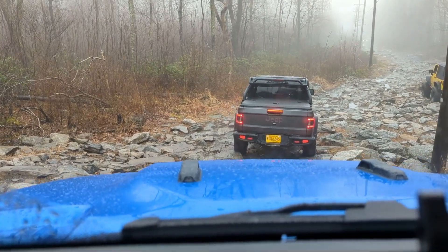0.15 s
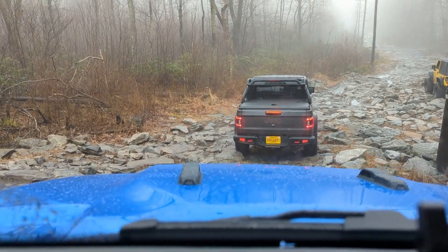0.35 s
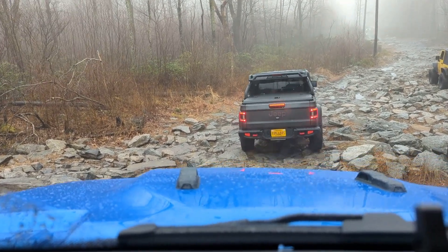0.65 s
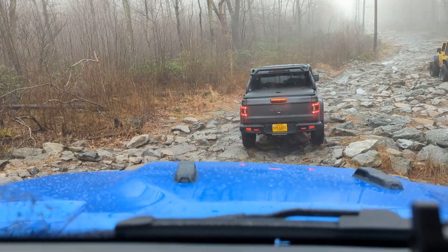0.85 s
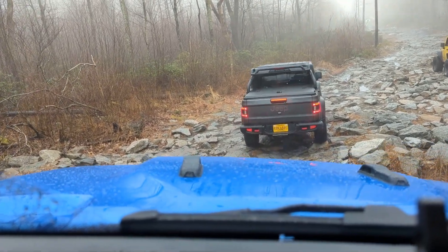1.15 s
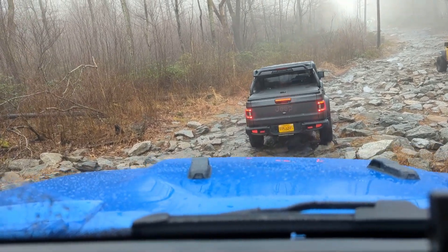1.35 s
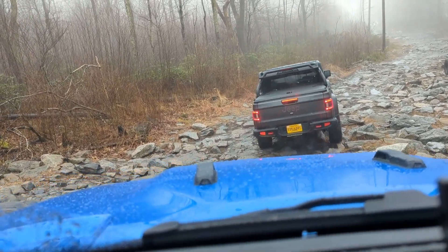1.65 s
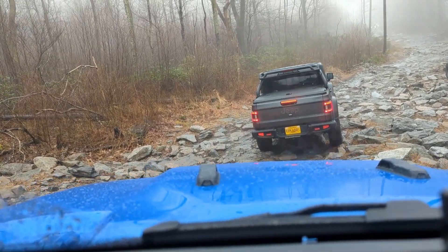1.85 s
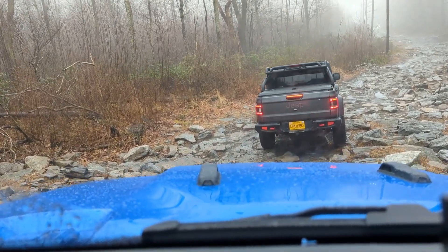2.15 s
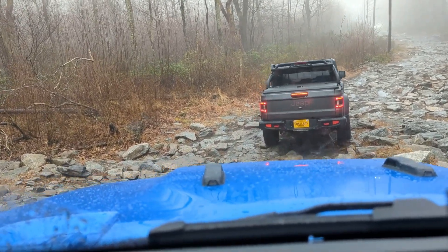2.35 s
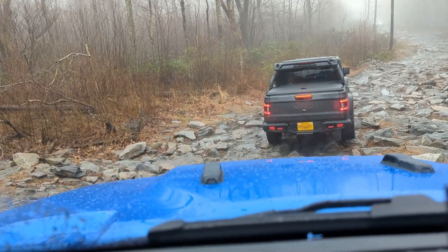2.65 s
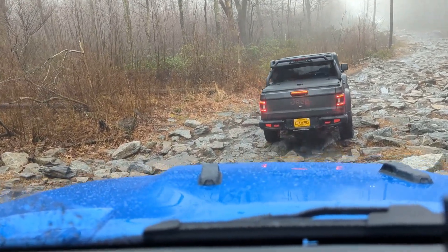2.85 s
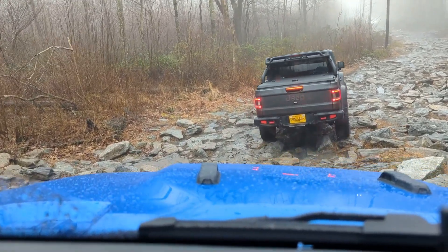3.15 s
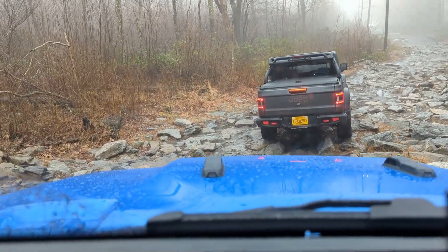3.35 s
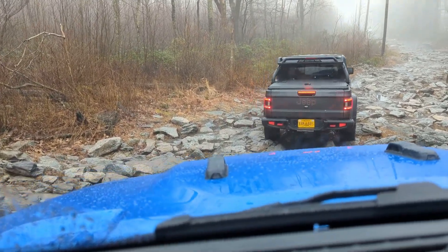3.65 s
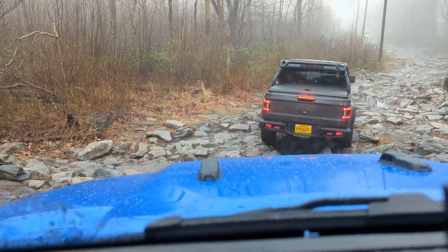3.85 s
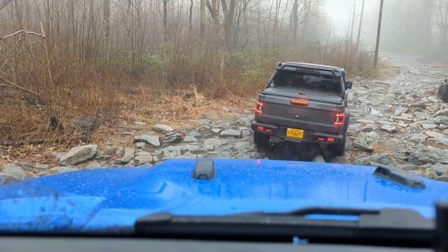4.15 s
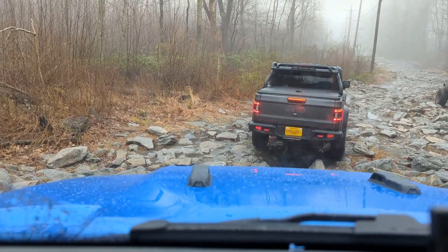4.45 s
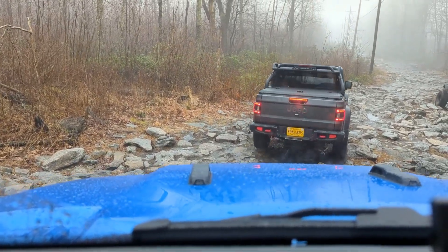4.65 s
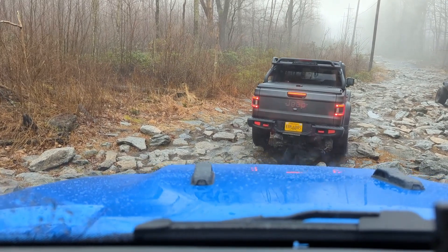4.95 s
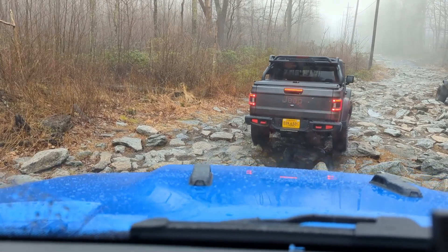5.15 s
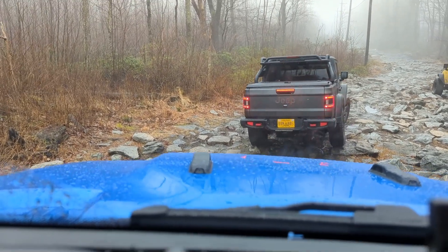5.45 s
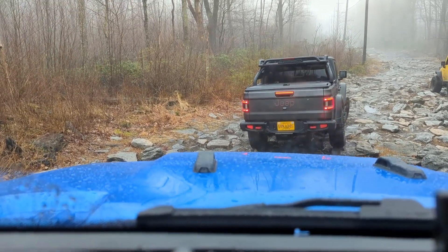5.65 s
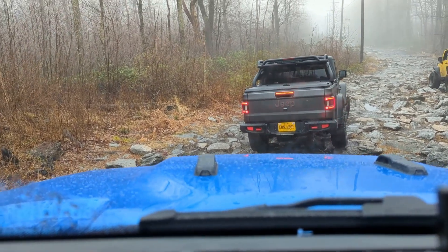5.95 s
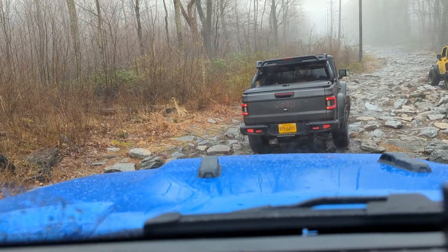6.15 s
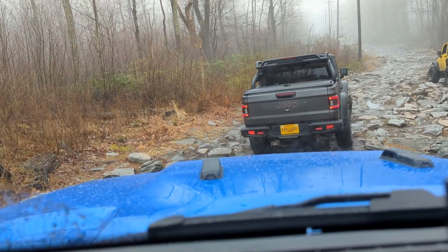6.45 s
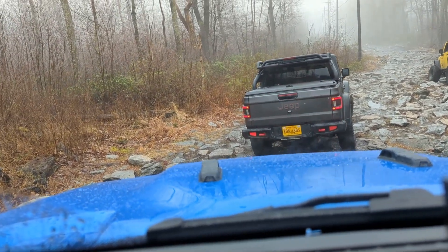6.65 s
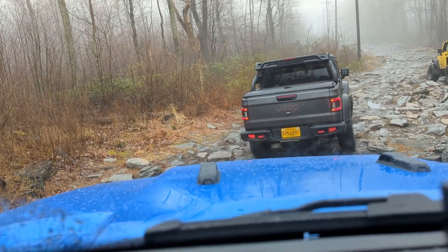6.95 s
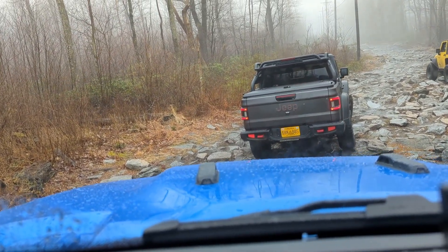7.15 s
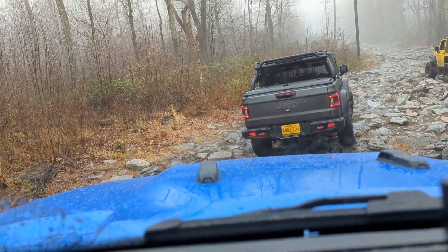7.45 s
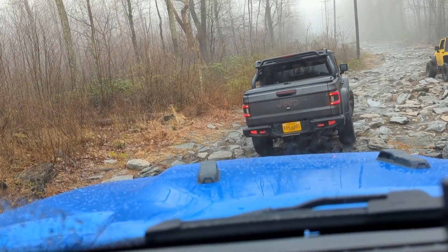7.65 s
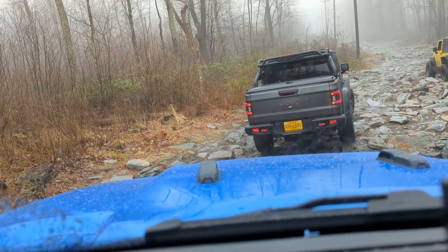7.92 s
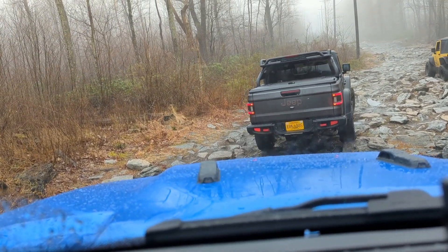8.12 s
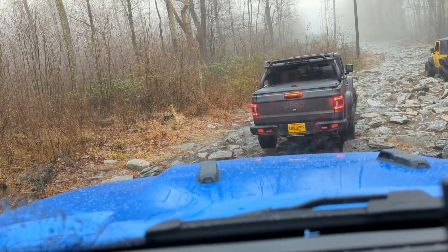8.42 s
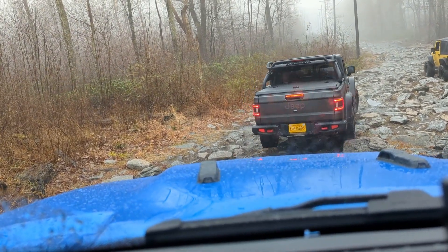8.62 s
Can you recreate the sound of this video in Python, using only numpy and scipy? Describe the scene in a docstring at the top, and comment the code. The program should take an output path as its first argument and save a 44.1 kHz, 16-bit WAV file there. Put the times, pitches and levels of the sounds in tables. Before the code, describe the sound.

Four-wheel-drive crawling up a wet stony trail: booming low engine, grinding tyres, heavy bumps near the middle, then a brief rev and easing.

```python
"""Inside the cab of a four-wheel-drive crawling up a wet, rocky trail.
From the start a fan whines on the right (steady tones over filtered noise) and cloth rustles (noise swells);
the engine labours and booms (harmonics of the crank speed lifted by cab resonances) as tyres grind (grainy noise).
Wheels thump off rocks (sinking tones) and trim knocks (ringing noise bursts), most densely near 5 s;
the engine then flares once and eases off, and late on a tyre squeaks (noise through two narrow resonances)."""
import sys
import numpy as np
from scipy import signal
from scipy.fft import rfft, irfft
from scipy.io import wavfile

SR = 44100
rng = np.random.default_rng(int(sys.argv[2]) if len(sys.argv) > 2 else 0)


def unload_wav(signal):
    """Save mono or channel-first audio to the path in sys.argv[1] as 16-bit WAV at rate SR, clipped to [-1, 1]."""
    wavfile.write(
        sys.argv[1],
        SR,
        np.round(np.clip(np.atleast_2d(signal).T, -1, 1) * 32767).astype(np.int16),
    )


N = 387198
TIME = np.arange(N) / SR  # seconds

# Engine under load. Each row: time in seconds, crank speed in turns per second [Hz], load in relative dB.
PULLING = [(0.0, 27.56, -41.5), (0.24, 26.45, -41.5), (0.43, 24.64, -41.5), (0.64, 26.92, -36),
           (0.75, 28.06, -39), (0.95, 27.75, -42), (1.08, 26.52, -43), (1.19, 26.92, -45.5),
           (1.94, 27.71, -43.5), (2.48, 27.57, -46), (3.5, 27.5, -44.5), (3.81, 26.05, -45.5),
           (4.02, 27.2, -45.5), (4.23, 27.2, -44.5), (4.72, 26, -40.5), (4.9, 26.93, -49.5),
           (5.12, 25.72, -40.5)]
# Engine easing off. Each row: time in seconds, crank speed in turns per second [Hz], load in relative dB.
EASING = [(5.2, 38.8, -42), (5.4, 37.14, -40), (5.59, 39.95, -35), (5.72, 37.63, -35.5), (5.96, 33.41, -38),
          (6.44, 32.73, -38), (6.76, 27.93, -53.5), (7.45, 30.57, -40.5), (8.78, 30.16, -42.5)]
# Crank orders under load. Each row: multiple of the crank speed, level in dB against the load.
PULLING_ORDERS = [(2, -3.5), (4, -0.5), (6, -1), (8, -7.5), (10, -12), (12, -14.5), (14, -20.5), (16, -24)]
# Crank orders easing off. Each row: multiple of the crank speed, level in dB against the load.
EASING_ORDERS = [(2, 1), (3, -15), (4, -12), (5, -11.5), (6, -19), (7, -16.5), (8, -18), (9, -22.5),
                 (10, -25)]
# How the cab lifts an order passing through it. Each row: frequency in Hz, gain in dB.
CAB_RESONANCE = [(50, -1), (75, 1.5), (102, 7.5), (120, -8), (133, 5.5), (146, 15.5), (156, 15.5),
                 (166, 8.5), (188, -0.5), (212, -3.5), (290, -1.5), (320, 4), (400, -9.5)]
# Rolling over stone. Each row: time in seconds, body rumble in relative dB, tyre grinding in relative dB.
GROUND = [(0.0, -46, -49.5), (0.4, -47.5, -57), (0.68, -45.5, -53.5), (1.5, -46.5, -52),
          (2.4, -48.5, -55.5), (2.85, -45.5, -51), (3.45, -45, -52), (3.9, -46.5, -56.5),
          (4.75, -48, -53.5), (4.9, -39.5, -49.5), (5.3, -50.5, -58), (5.75, -41.5, -58),
          (6.75, -50.5, -59), (8.0, -50.5, -55.5), (8.78, -49.5, -61)]

# Noise spectra, scaled to unit level on use. Each row: frequency in Hz, density in relative dB per Hz.
RUMBLE_SPECTRUM = [(20, -30), (30, -7), (40, -0.5), (55, 8), (80, 7), (125, 1), (200, -1.5), (260, -6),
                   (340, -6), (450, -19.5), (900, -58)]
GRIND_SPECTRUM = [(150, -13), (300, 4), (400, 5.5), (500, 3), (680, 1), (850, -0.5), (1100, -3.5),
                  (1500, -10), (2500, -12), (6000, -77)]
CRUNCH_SPECTRUM = [(600, -3), (1200, 0), (1600, 1.5), (2100, 0), (2700, 1), (3400, -8.5), (4400, -3),
                   (6000, -18.5), (15000, -35)]
CLOTH_SPECTRUM = [(800, -22), (2500, 1.5), (4300, -3.5), (5700, -2.5), (7400, -1), (8100, -6), (8900, 0),
                  (10200, 2), (11600, 2.5), (13000, -2), (13900, -4.5), (14800, 2), (16000, -6)]
FAN_AIR_SPECTRUM = [(400, -14.5), (670, -6), (850, -29), (1080, -12.5), (1190, -5.5), (1290, -3.5),
                    (1430, -14), (1900, -24), (2090, -7.5), (2300, -32), (5000, -36), (15000, -32)]
# Blower whine. Each row: frequency in Hz, middle level in dB, left minus right in dB.
FAN_TONES = [(1240, -66.5, -12.5), (668, -73, -3), (2095, -79, 5)]
# Coherence of the noise between left and right. Each row: frequency in Hz, likeness from 0 to 1.
LIKENESS = [(60, 0.9), (160, 1), (260, 0.67), (500, 0.42), (1000, 0.041), (2000, 0), (16000, 0.0092)]
# Stereo balance of the noise. Each row: frequency in Hz, left minus right in dB.
BALANCE = [(50, -4), (130, 3), (300, -0.5), (700, 0), (1050, 1), (1250, -6.5), (1550, -0.5), (2100, 1.5),
           (3500, 2.5), (5200, -0.5), (7300, 6.5), (9000, 6.5), (11500, 1), (15000, .5)]

# Wheels dropping off rocks. Each row: start in seconds, level in dB, final pitch in Hz, swell time in seconds.
THUMPS = [(3.115, -29, 97.3, .017), (3.432, -19.5, 70.5, 0.012), (3.458, -20, 48, 0.026),
          (4.867, -18.5, 69, 0.0098), (4.896, -17, 54.7, 0.022), (4.945, -21, 51, 0.0088)]
# Body panels flexing. Each row: start in seconds, level in dB, final pitch in Hz.
FLEXES = [(1.71, -41, 223), (4.953, -33.5, 233), (5.135, -37, 198), (7.748, -40, 204.3)]
# Knocks of trim, suspension and stones. Each row: start in seconds, relative level in dB, ring in Hz,
# 60 dB decay time in seconds, dull panel knock in dB against that level.
KNOCKS = [(.466, -43, 1902, .032, -12), (.555, -42, 1900, .03, -4), (.59, -42, 1700, 0.057, 4),
          (0.619, -43, 1703, .06, 6), (.726, -45, 1100, 0.018, 1), (1.075, -25, 2110, 0.022, -19),
          (1.113, -47, 1700, .05, 10), (1.154, -45, 2406, 0.094, -8), (1.606, -41, 1101, 0.055, 5.5),
          (2.079, -40, 899, 0.05, -10), (2.567, -31.5, 2620, .018, -22), (3.389, -41.5, 2488, 0.027, -7),
          (3.439, -35.5, 1800, 0.041, 1.5), (3.729, -37.5, 1030, 0.053, -20), (4.127, -48, 1501, .06, 13),
          (4.55, -35, 4650, 0.01, -7), (4.756, -31.5, 2596, 0.012, -17), (4.821, -50, 900, .12, 14),
          (4.877, -40, 1624, .076, 7), (4.928, -40, 850, 0.05, 1), (4.958, -40.5, 2672, 0.062, 3),
          (5.048, -39.5, 1150, 0.038, -5), (5.1, -38, 1400, 0.029, -1), (5.673, -40, 2640, 0.066, 3),
          (7.586, -33, 2500, 0.027, -11), (7.835, -39.5, 2620, .04, -12), (8.035, -42, 960, .06, -16),
          (8.372, -49, 3468, .03, -3)]
# A tyre crushes a patch of grit. Each row: peak in seconds, level in dB, rise in seconds, fall in seconds.
CRUNCHES = [(.1, -65, 0.22, 0.52), (1.12, -56.5, 0.25, 0.36), (1.8, -65.5, 0.9, 0.68),
            (3.2, -56.5, 0.42, 0.41), (4.92, -56, 0.19, 0.26), (7.36, -52.5, .1, 0.1),
            (7.58, -48.5, .06, 0.034), (7.99, -52, .35, 0.23)]
# The jacket rustles at each sway of the cab. Each row: peak in seconds, relative level in dB,
# rise in seconds, fall in seconds.
RUSTLES = [(.11, -51, .15, 0.076), (.29, -52, 0.17, 0.1), (.6, -56.5, 0.19, 0.067),
           (1.12, -53.5, 0.42, 0.28), (1.55, -53, 0.21, .12), (1.8, -56, 0.15, 0.53),
           (2.53, -55, 0.17, 0.19), (3.18, -53, 0.4, 0.55), (3.55, -60.5, .2, .3), (4.1, -56, 0.21, 0.21),
           (4.62, -57.5, 0.24, 0.39), (4.92, -48.5, 0.082, 0.22), (4.962, -45, 0.019, 0.032),
           (5.14, -60, 0.12, 0.22), (5.72, -61.5, 0.29, 0.47), (6.58, -62, 0.16, .4),
           (7.03, -64, 0.14, 0.09), (7.36, -48.5, 0.086, 0.21), (7.55, -50.5, 0.092, 0.095),
           (7.83, -49, .14, 0.22), (8.02, -54.5, 0.15, 0.37), (8.62, -63, 0.75, .13)]
# A wet tyre slips on stone. Each row: peak in seconds, relative level in dB, rise in seconds, fall in seconds.
SLIPS = [(7.36, -50, 0.099, 0.13)]
# Resonances that the slip excites. Each row: frequency in Hz, width in Hz, relative level in dB.
SQUEAK_MODES = [(2180, 200, 0), (4200, 460, 4)]

SWELL_DROP_DB, SWELL_ROUNDNESS = 10.5, 1.4  # fall over one rise or fall time; above 1 the top is rounded
GRIT_BED_DB, CLOTH_BED_DB = -69, -74.5  # what is left between crunches and between rustles, relative
FREED_S, UNLOAD_S, PICK_UP_S = 5.2, 0.15, 0.1  # load drops away as the rock is cleared, then is taken up again
SHAKE_RAD = 0.011  # RMS shake of the crank angle from uneven firing
BOOM_HZ, BOOM_WIDTH_HZ = 148, 65  # the cab's standing wave
EDGE_HZ = 15800


def gain_of(db):
    """Decibel law: 20 dB is a factor of ten in amplitude."""
    return 10 ** (np.asarray(db) / 20)


def evened(x):
    """Normalisation to unit RMS."""
    return x / np.sqrt(np.mean(x ** 2) + 1e-20)


def read(points, hz):
    """Interpolation by straight lines on a log-frequency axis."""
    f, value = np.transpose(points)
    return np.interp(np.log(hz + 1), np.log(f + 1), value)


def curves(rows):
    """Linear interpolation in time: each column of a table as a value per sample."""
    s, *columns = np.transpose(rows)
    return [np.interp(TIME, s, column) for column in columns]


def add(mix, s, sound):
    """Superposition: a sound is added from its starting time, cut at the end."""
    part = mix[:, max(round(s * SR), 0):][:, :sound.shape[-1]]
    part += sound[..., :part.shape[1]]


def pan(side_db):
    """Level-difference stereo: half the difference is given to each side, with opposite signs."""
    return gain_of(np.array([[0.5], [-0.5]]) * side_db)


def wander(rate_hz):
    """Low-passed chance: noise of unit RMS with a Gaussian roll-off around the given rate."""
    hz = np.fft.rfftfreq(N, 1 / SR)
    slow = rfft(rng.standard_normal(N)) * np.exp(-(hz / rate_hz) ** 2)
    return evened(irfft(slow, N))


def swells(rows):
    """Power addition of swells that each rise to a peak and fall away; gives gain per sample."""
    power = np.zeros(N)
    for s, db, rise, fall in rows:
        away = np.maximum((s - TIME) / rise, (TIME - s) / fall)
        power += gain_of(db - SWELL_DROP_DB * abs(away) ** SWELL_ROUNDNESS) ** 2
    return np.sqrt(power)


def in_cab(drive, spectrum):
    """Partial coherence: two unrelated signals are coloured and made most alike in the bass."""
    hz = np.fft.rfftfreq(N, 1 / SR)
    a, b = rfft(drive)
    same = np.clip(read(LIKENESS, hz), -1, 1)
    pair = np.array([a, same * a + np.sqrt(1 - same ** 2) * b])
    pair = pair * pan(read(BALANCE, hz))
    sound = irfft(pair * gain_of(read(spectrum, hz)), N)
    return sound / np.std(sound.mean(0))


def grains(per_s, spread_db, share):
    """Stick-slip as shot noise: sparse slips of uneven size over a bed of countless smaller ones."""
    happens = rng.random(N) < per_s / SR
    size = gain_of(spread_db * np.minimum(rng.exponential(1, N), 4)) * happens
    slips, bed = rng.standard_normal((2, 2, N))
    return np.sqrt(share) * evened(slips * size) + np.sqrt(1 - share) * bed  # share is of the power


def fan():
    """Broadband flow noise from the vents and the slightly wavering tones of the blower."""
    out = gain_of(-59.5) * in_cab(rng.standard_normal((2, N)), FAN_AIR_SPECTRUM)
    clock = np.cumsum(1 + 0.0012 * wander(5.8)) / SR  # all tones waver together in pitch
    for hz, db, side_db in FAN_TONES:
        level = gain_of(db + 2.4 * wander(3.5))
        out += pan(side_db) * level * np.sqrt(2) * np.sin(2 * np.pi * hz * clock)
    return out


def jacket():
    """Dry friction: cloth slides on cloth in a fine, fluttering hiss."""
    sway = np.hypot(swells(RUSTLES), gain_of(CLOTH_BED_DB))
    flutter_db = 2.5 + 1.1 * wander(30) + 0.66 * wander(17)
    return sway * gain_of(flutter_db) * in_cab(grains(per_s=2500, spread_db=-1, share=0.15), CLOTH_SPECTRUM)


def rattle(hz, sharpness, t60):
    """Modal decay: a noise burst of dense panel modes around one resonance dies away in two slopes."""
    t = np.arange(SR // 4) / SR
    burst = rng.standard_normal((2, len(t)))
    ring = evened(signal.lfilter(*signal.iirpeak(min(hz, SR / 3), sharpness, fs=SR), burst))
    onset = 1 - np.exp(-t / 0.0004)
    decay = gain_of(-60 * t / t60) + gain_of(-27) * gain_of(-60 * t / 0.16)
    return ring * onset * decay


def knock(db, hz, t60, body_db):
    """Impact excitation: a hard contact rings a small part and, more dully, the panel that carries it."""
    small = rattle(hz, sharpness=4.9, t60=t60)
    muffled = signal.lfilter(*signal.butter(2, min(2.0 * hz, SR / 3), fs=SR), small)
    panel = signal.lfilter(*signal.butter(2, 900, fs=SR), rattle(hz=408, sharpness=1.6, t60=0.079))
    return gain_of(db) * (pan(3.2) * muffled + gain_of(body_db) * panel)


def pebbles():
    """Random impacts: small stones click under the tyres, loudest where grit is being crushed."""
    per_s, over_grit_db, spread_db = 9, 11.5, 2.5
    middle_hz, spread_octaves = 1980, 0.31
    crush = swells(CRUNCHES) + gain_of(GRIT_BED_DB)
    out = np.zeros((2, N))
    for when, size, pitch in rng.random((round(per_s * N / SR), 3)):
        at = int(when * N)
        db = over_grit_db + spread_db * (2 * size - 1)
        hz = middle_hz * 2 ** (spread_octaves * (2 * pitch - 1))
        add(out, at / SR, crush[at] * knock(db, hz, t60=0.028, body_db=-12))
    return out


def squeak():
    """Friction-driven resonance: slipping rubber excites two narrow modes."""
    slips = rng.standard_normal((2, N))
    rings = np.zeros((2, N))
    for hz, width_hz, db in SQUEAK_MODES:
        mode = signal.lfilter(*signal.iirpeak(hz, hz / width_hz, fs=SR), slips)
        rings += gain_of(db) * evened(mode)
    return pan(1.7) * swells(SLIPS) * rings


def thump(db, end_hz, sink, swell):
    """Load-dependent stiffness: a tyre or panel lets go in a low ring that sinks as the load comes off."""
    t = np.arange(SR // 3) / SR
    hz = end_hz * (1 + sink * np.exp(-t / 0.037))
    envelope = t / swell * np.exp(1 - t / swell)  # reaches 1 at the swell time
    return pan(1.0) * gain_of(db) * envelope * np.sin(2 * np.pi * np.cumsum(hz) / SR)


def tyres():
    """Rolling contact: stone shakes the body, grinds in the wheel wells and is crushed as grit."""
    rumble_db, grind_db = curves(GROUND)
    crush = np.hypot(swells(CRUNCHES), gain_of(GRIT_BED_DB))
    rumble = gain_of(rumble_db + 6.0) * in_cab(rng.standard_normal((2, N)), RUMBLE_SPECTRUM)
    grind_gain = gain_of(grind_db + 1.0 + 1.37 * wander(31))
    grind = grind_gain * in_cab(grains(per_s=260, spread_db=1.7, share=0.33), GRIND_SPECTRUM)
    grit_gain = crush * gain_of(1.6 * wander(30))
    grit = grit_gain * in_cab(grains(per_s=430, spread_db=-1.5, share=0.19), CRUNCH_SPECTRUM)
    return rumble + grind + grit


def engine(rows, orders, side_db, lope_db):
    """Order synthesis: crank harmonics are coloured by the cab; uneven firing shakes phase and level."""
    turns_hz, load_db = curves(rows)
    angle = 2 * np.pi * np.cumsum(turns_hz) / SR + SHAKE_RAD * wander(11)
    out = np.zeros((2, N))
    for order, db in orders:
        hz = order * turns_hz
        level_db = load_db + db + read(CAB_RESONANCE, hz) + lope_db * wander(21.2)
        near_boom = np.exp(-((hz - BOOM_HZ) / BOOM_WIDTH_HZ) ** 2)
        tone = np.sqrt(2) * np.sin(order * angle + 2 * np.pi * rng.random())
        out += pan(side_db * near_boom) * gain_of(level_db) * tone  # the standing wave is stronger on the left
    return out


def drone():
    """Change of load: the engine pulls until the rock is cleared, then runs free."""
    pulling = engine(PULLING, PULLING_ORDERS, side_db=5.0, lope_db=1.64)
    easing = engine(EASING, EASING_ORDERS, side_db=5.5, lope_db=0.2)
    loaded = np.clip((FREED_S - TIME) / UNLOAD_S, 0, 1)
    freed = np.clip((TIME - FREED_S) / PICK_UP_S, 0, 1)
    return loaded * pulling + freed * easing


def scene():
    """Superposition of the continuous sources and the single events."""
    mix = fan() + jacket() + pebbles() + squeak() + tyres() + drone()
    for s, *row in KNOCKS:
        add(mix, s, knock(*row))
    for s, db, hz in FLEXES:
        add(mix, s, thump(db, hz, sink=0.066, swell=0.021))
    for s, db, hz, swell in THUMPS:
        add(mix, s, thump(db, hz, sink=0.52, swell=swell))
    return mix


def record(dry):
    """Band limiting: a linear-phase low-pass removes the top of the treble."""
    low_pass = signal.firwin(1023, EDGE_HZ, window=("kaiser", 9), fs=SR)
    return signal.oaconvolve(dry, low_pass[None], "same", axes=1)


dry = scene()
out = record(dry)
unload_wav(out)
```